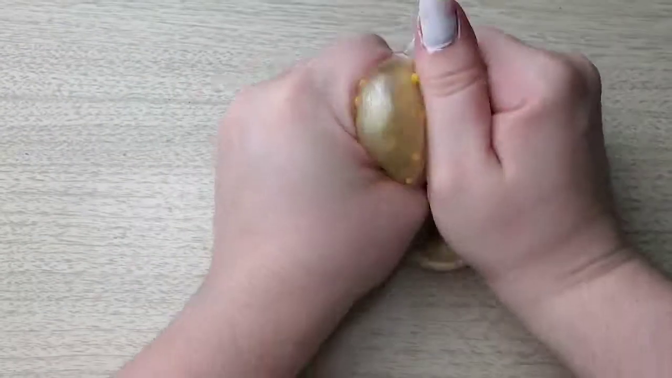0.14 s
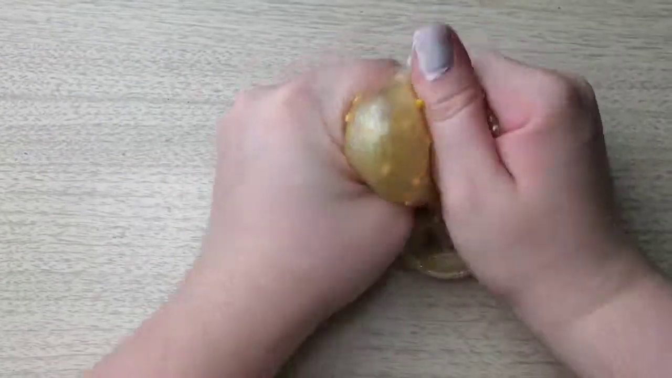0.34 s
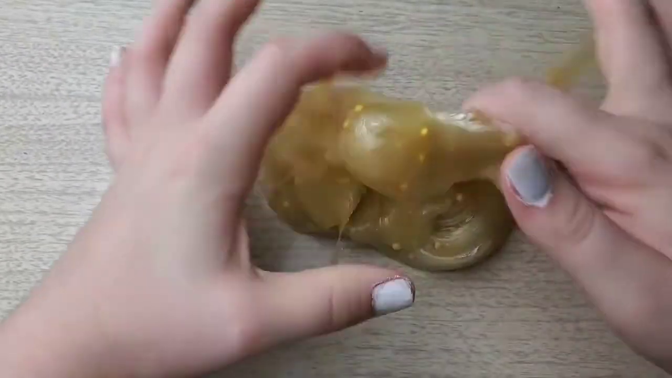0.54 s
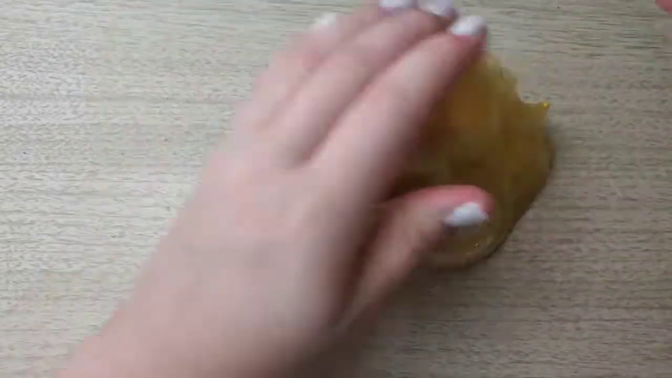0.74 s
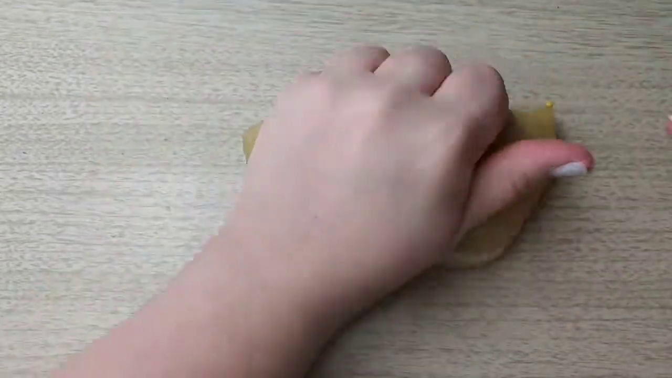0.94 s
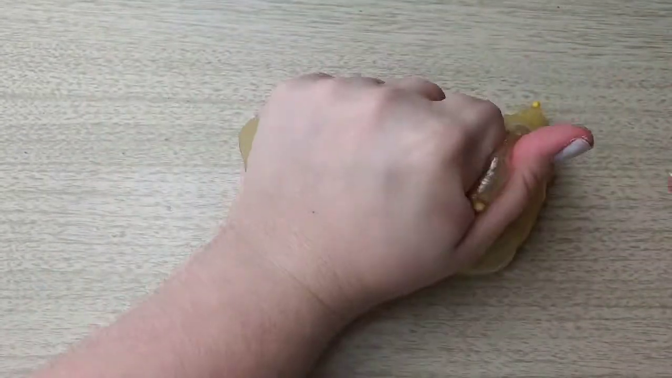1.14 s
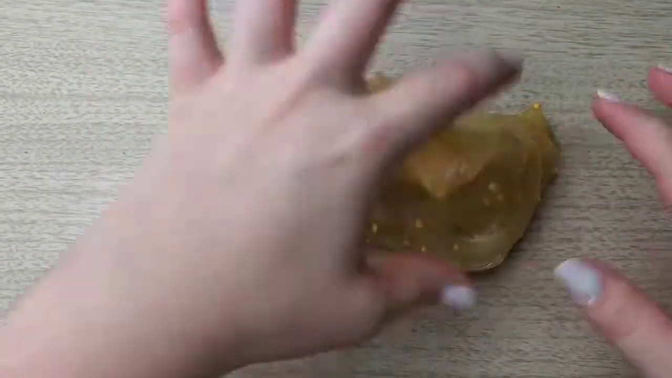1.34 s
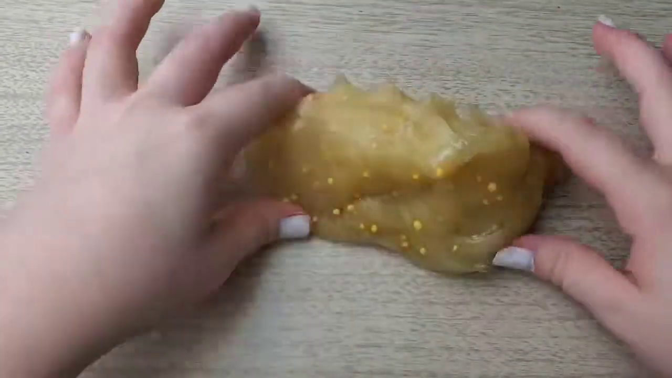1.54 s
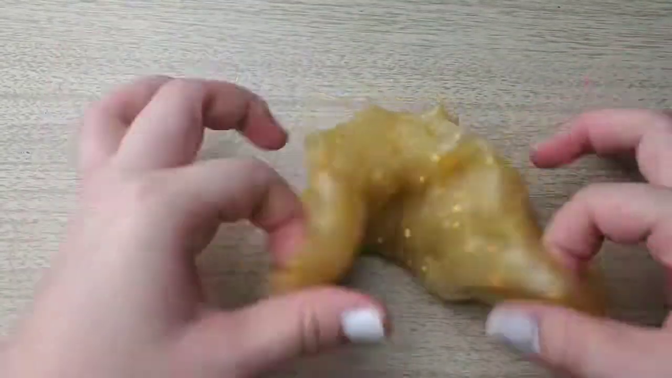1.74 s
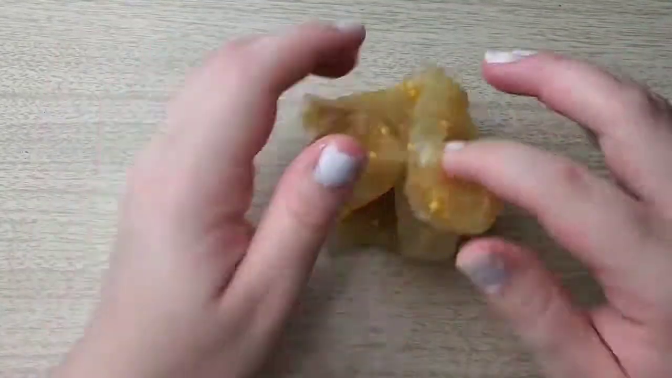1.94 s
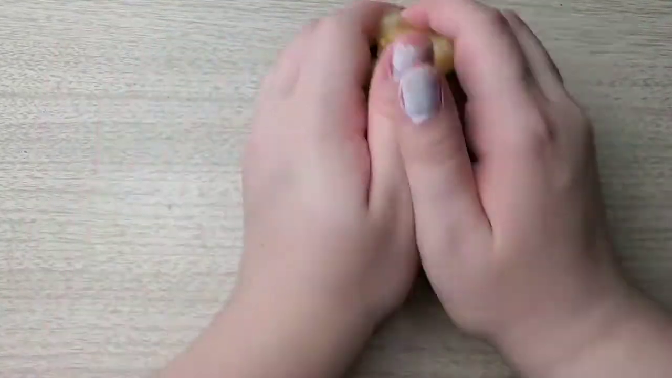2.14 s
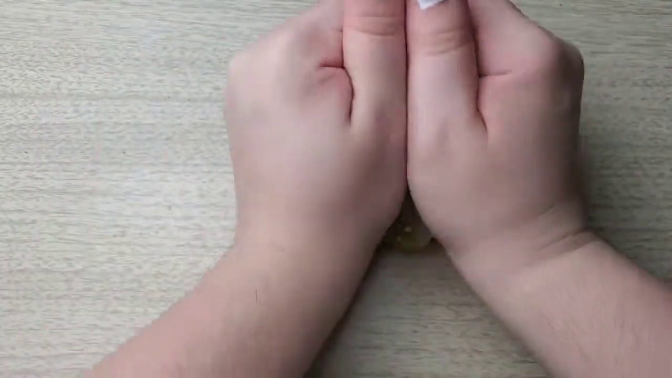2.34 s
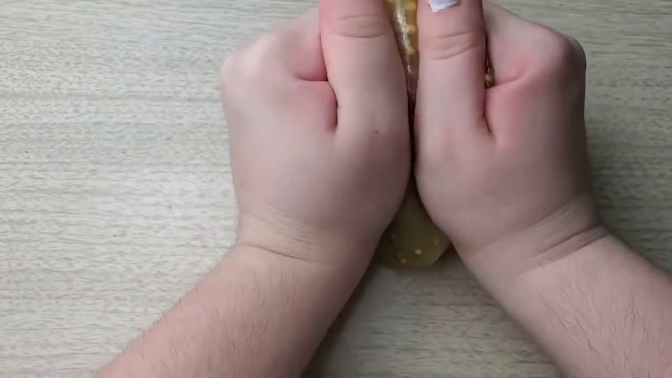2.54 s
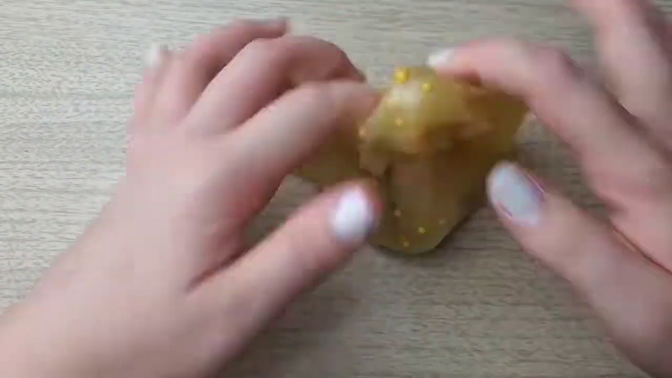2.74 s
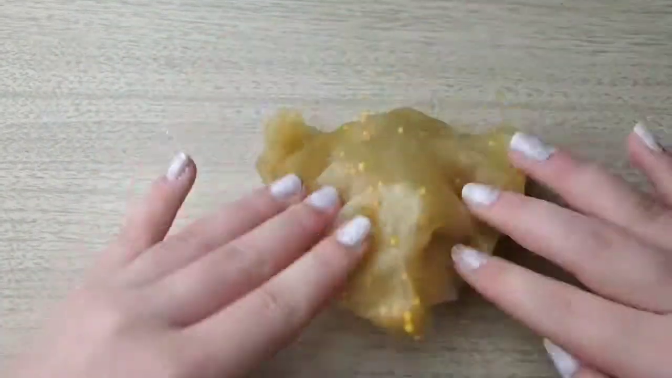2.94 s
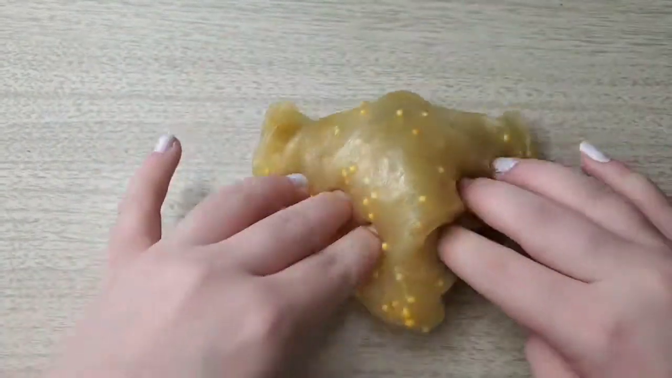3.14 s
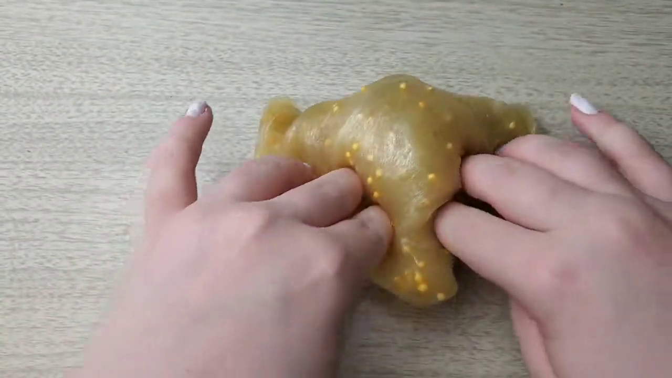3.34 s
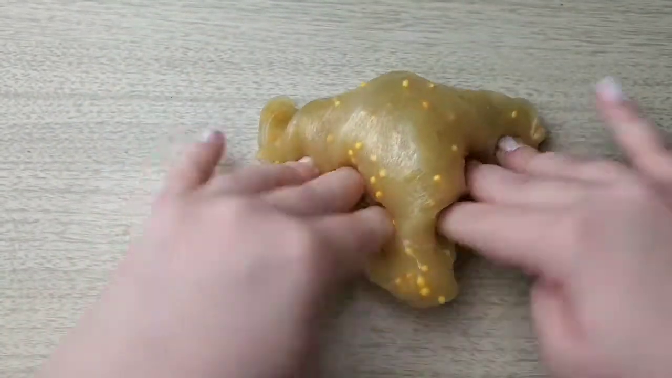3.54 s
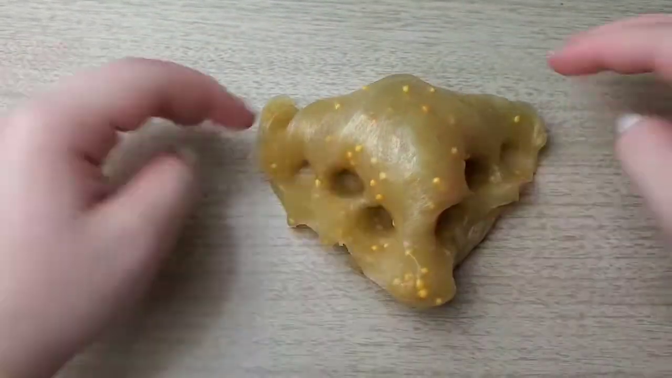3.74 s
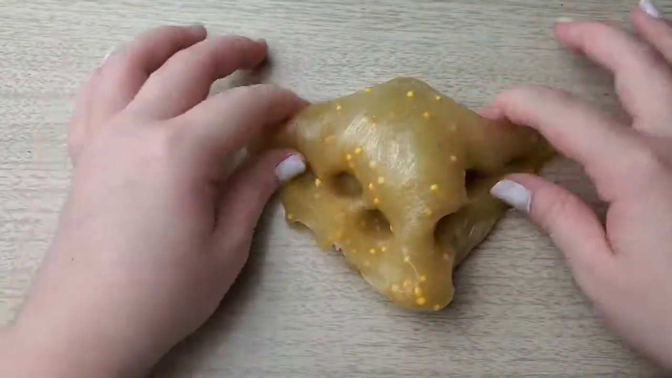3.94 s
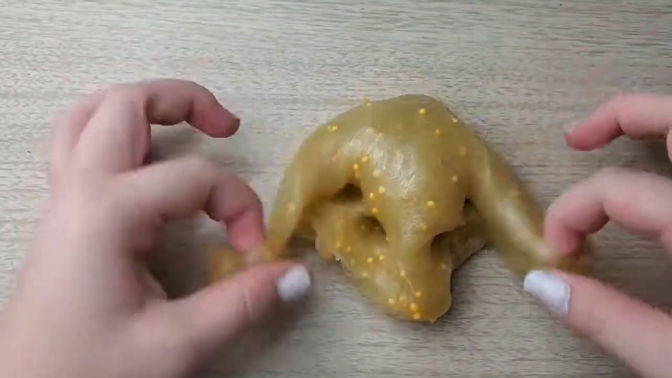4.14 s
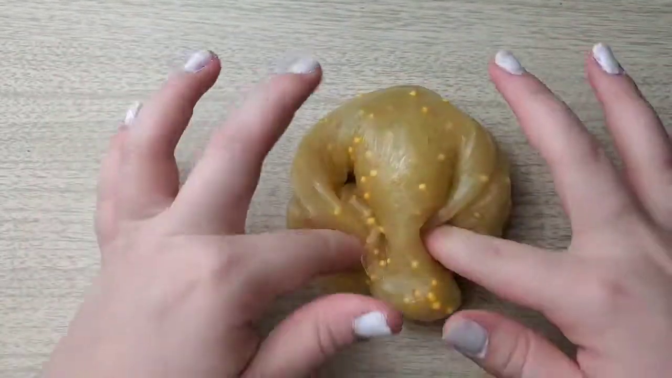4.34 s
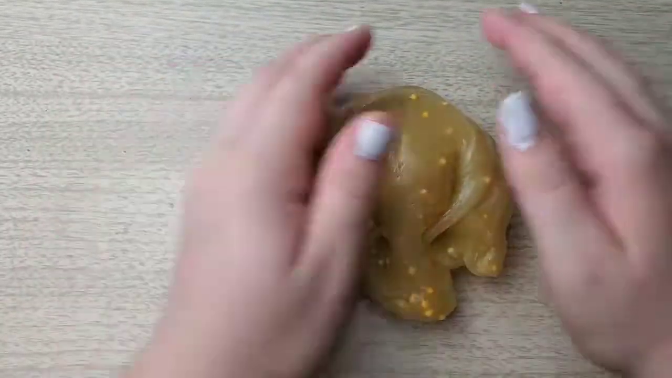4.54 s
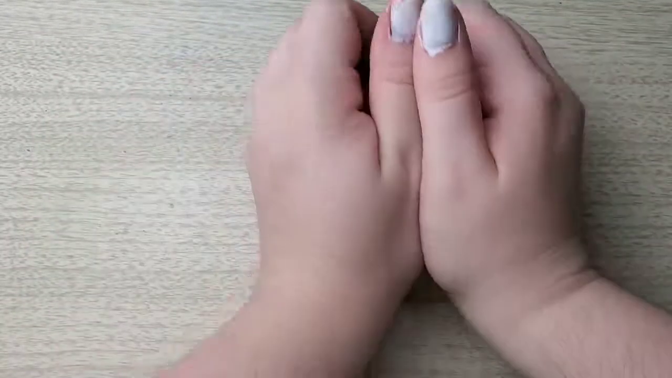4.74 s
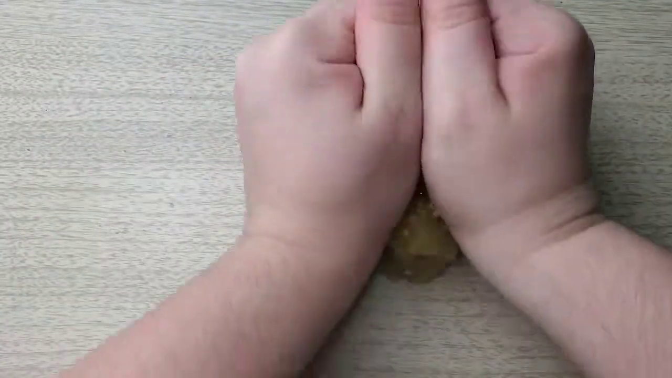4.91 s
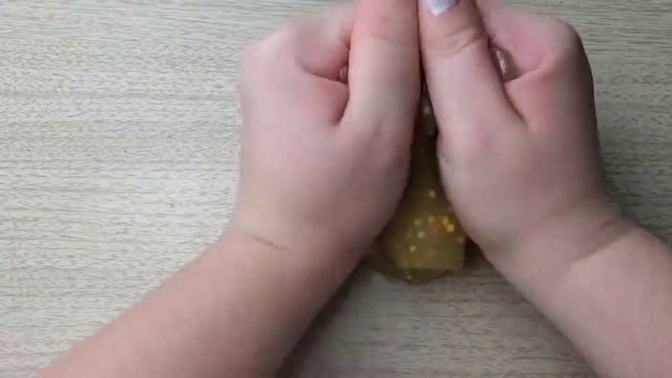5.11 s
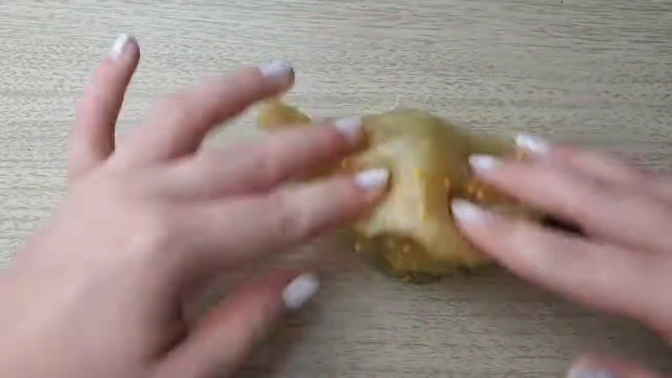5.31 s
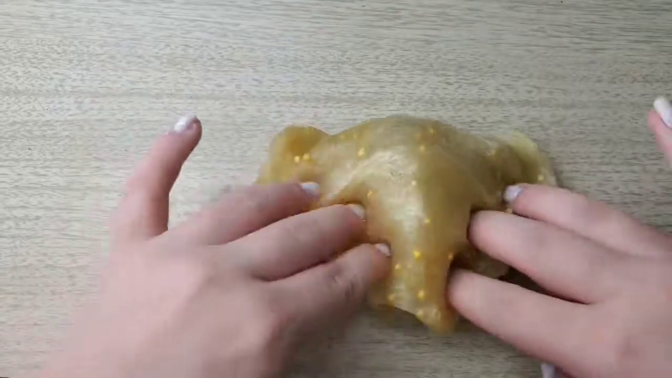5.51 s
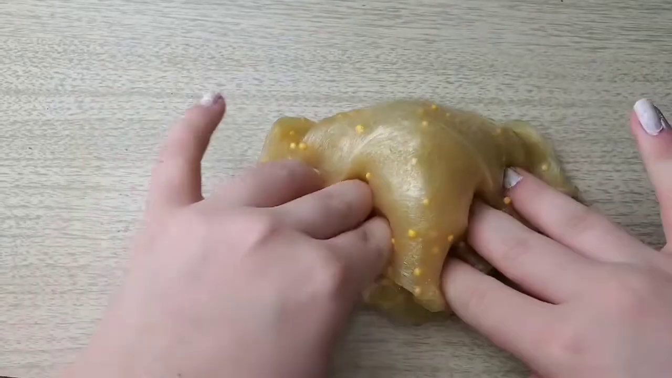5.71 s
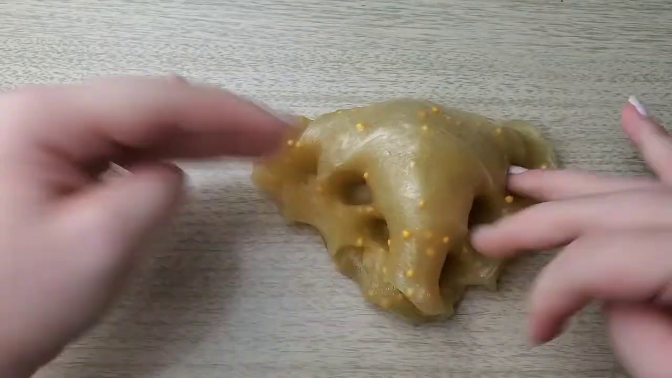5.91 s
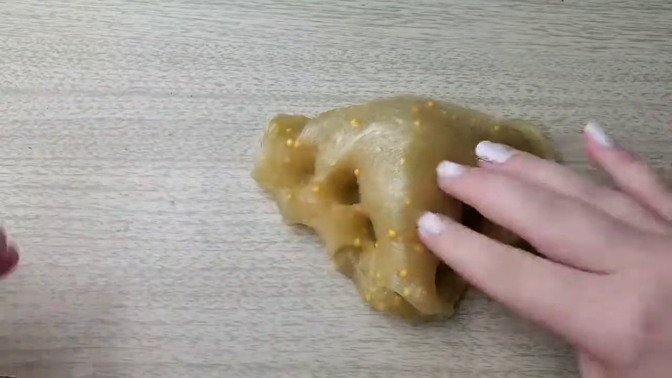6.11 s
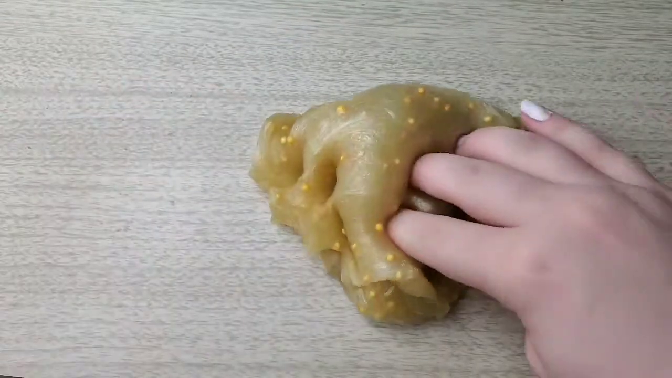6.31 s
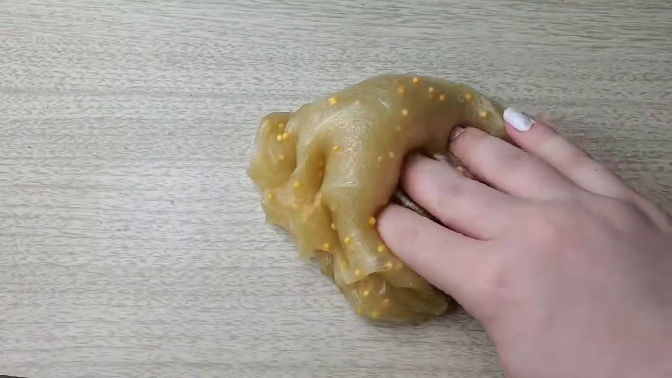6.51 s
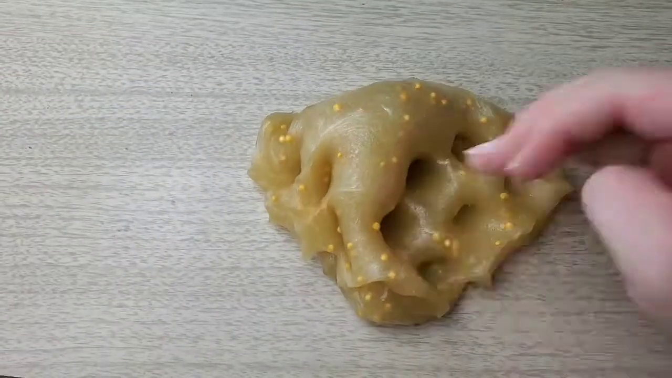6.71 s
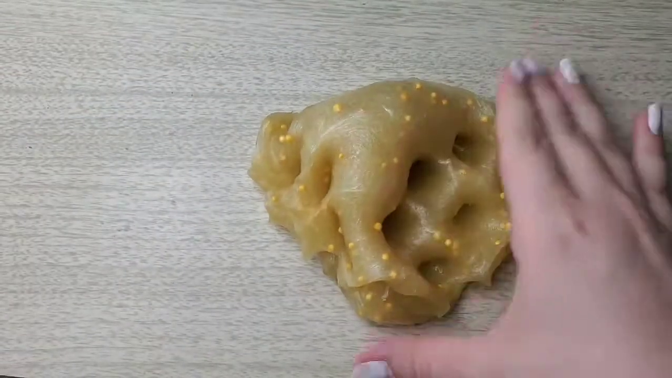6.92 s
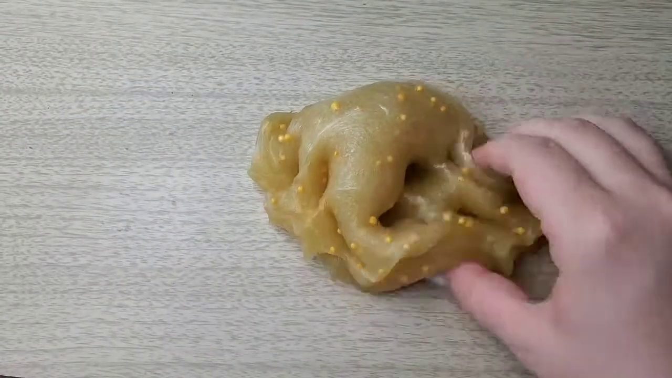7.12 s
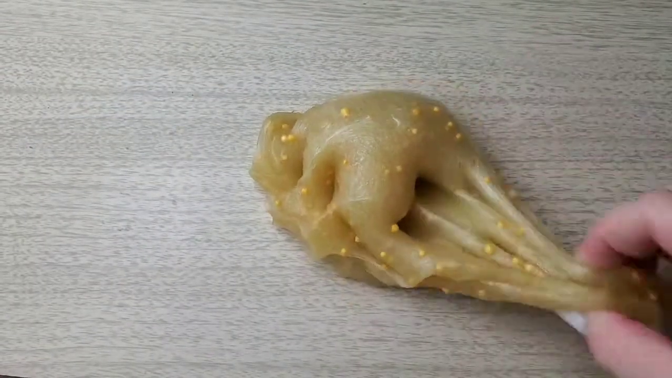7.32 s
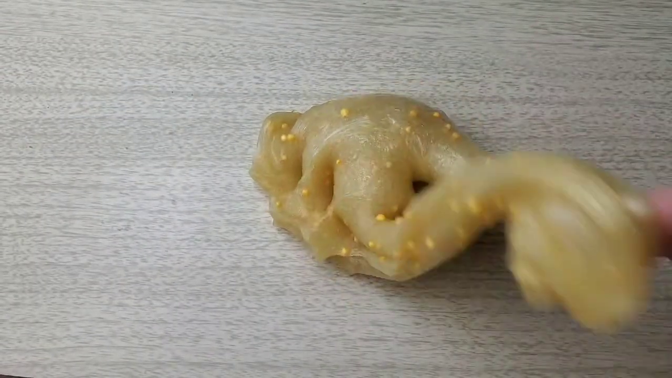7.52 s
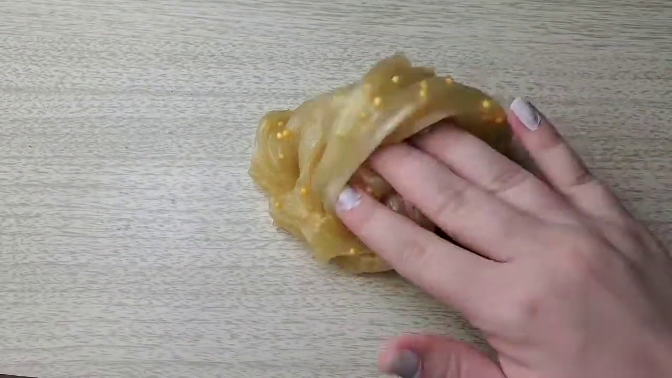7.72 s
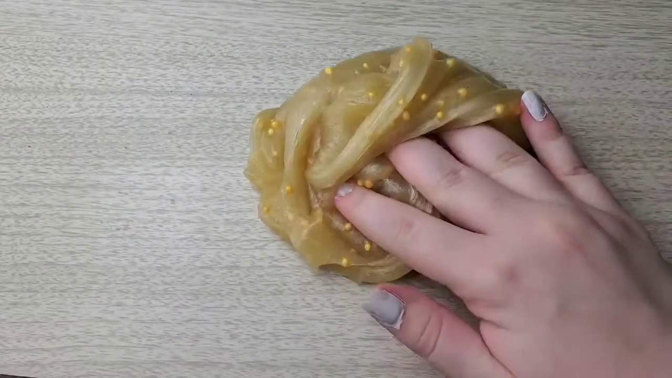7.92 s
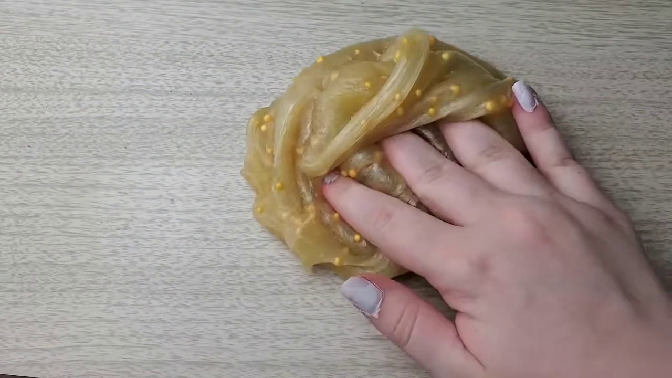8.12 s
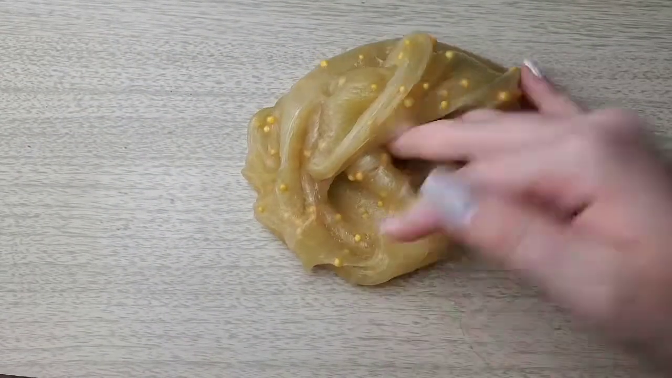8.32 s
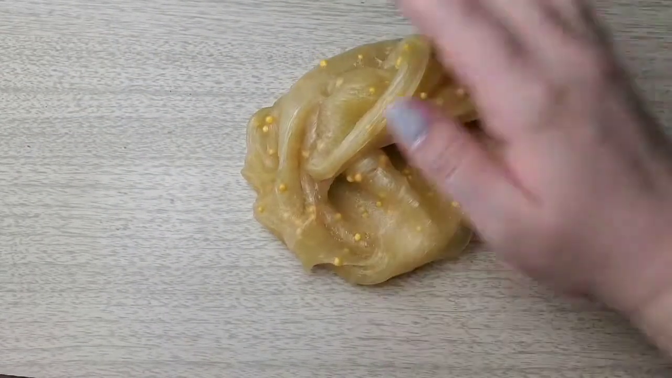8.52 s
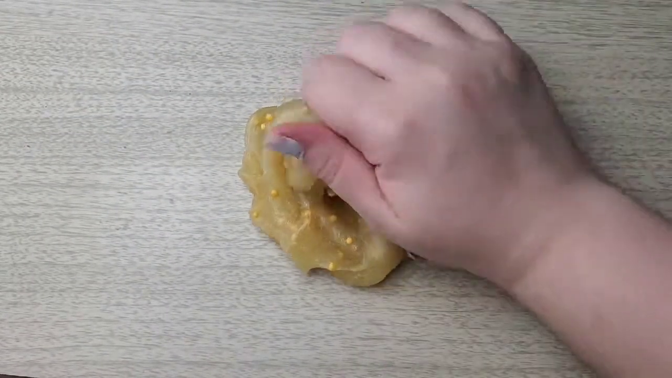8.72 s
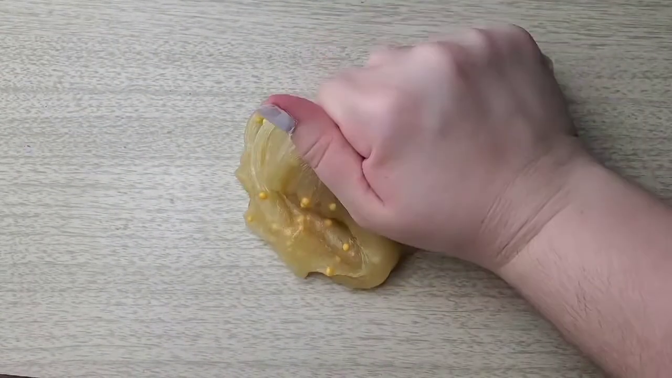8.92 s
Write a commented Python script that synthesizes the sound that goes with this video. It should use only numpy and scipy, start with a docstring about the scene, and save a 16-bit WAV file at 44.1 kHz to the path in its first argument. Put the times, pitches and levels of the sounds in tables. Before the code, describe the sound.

Close, crisp popping air pockets and sticky peeling crackle from slime worked by two hands, with soft bumps and plops over faint indoor hum.

```python
"""Throughout, a machine hums somewhere in the house over drifting room air: narrow and broad bands of noise.
Two hands knead sticky slime on a table in a small quiet room, starting with a dense run of sharp snaps:
bursting air pockets, each a torn-film noise that rings. Peeling skin crackles around them as filtered random ticks.
An early bump of the palms is a low decaying sine; then finger holes begin to close with hollow decaying plops.
Clusters of snaps, plops and crackle return between quieter spells, with a few more bumps in the second half."""
import sys
import numpy as np
from scipy import signal
from scipy.io import wavfile
from scipy.ndimage import uniform_filter1d

SR = 44100
rng = np.random.default_rng(int(sys.argv[2]) if len(sys.argv) > 2 else 0)


def wav_out(sig):
    """Save sig, one row per channel (or a flat mono array), as 16-bit PCM at SR to the path in sys.argv[1]."""
    wavfile.write(sys.argv[1], SR, np.round(np.clip(np.atleast_2d(sig).T, -1, 1) * 32767).astype(np.int16))


N = 395136


def amp(db):
    """Decibel law: a level in dB becomes an amplitude ratio."""
    return 10 ** (np.asarray(db) / 20)


def band(x, hz, width):
    """Second-order resonance with gain 1 at the centre; the width in Hz sets its damping."""
    centre = min(hz, .45 * SR)
    return signal.lfilter(*signal.iirpeak(centre, hz / width, fs=SR), x)


def fade(t60, count):
    """Exponential decay: the level falls 60 dB in t60 seconds."""
    return np.exp(-np.log(1000) * np.arange(count) / (t60 * SR))


def unit(x):
    """Power normalisation: the root mean square becomes 1."""
    return x / np.sqrt(np.mean(x ** 2))


def peak(x, db):
    """Peak normalisation: the largest excursion takes the given level."""
    return x * amp(db) / np.abs(x).max()


def add(out, start_s, x):
    """Superposition: a sound is summed into the output from its start time."""
    i = max(int(start_s * SR), 0)
    out[..., i:i + x.shape[-1]] += x[..., :N - i]


def walk(rate):
    """Slow random modulation: levels held 1 / rate s and smoothed twice; spread near 1."""
    hold = int(SR / rate)
    steps = np.repeat(rng.standard_normal(N // hold + 1), hold)
    return 1.3 * uniform_filter1d(uniform_filter1d(steps, hold), hold)[:N]


def pair(shape, likeness):
    """Interchannel coherence: left and right noise share a mid part and oppose in a side part."""
    c = np.clip(likeness, 0, 1)
    mid, side = rng.standard_normal((2, shape))
    return np.sqrt(1 + c) * mid + np.sqrt(1 - c) * side * np.array([[1], [-1]])


def ticks(rate):
    """Shot process: random tiny decaying bursts, rate per second, a few much louder than the rest."""
    sizes_db = 3.04 * np.minimum(rng.exponential(size=N), 4.5)
    impulses = amp(sizes_db) * (rng.random(N) < rate / SR)
    return signal.lfilter([1], [1, -np.exp(-1 / (0.0014 * SR))], impulses)


# spectrum of the room air: centre_hz [Hz], density_db [dB per Hz, relative]
AIR_SPECTRUM = [(15, -34), (25, -6.5), (64, -25), (102, -1), (149, -10), (190, -6), (242, -3), (309, -9),
                (840, -24), (1040, -43.5), (2610, -55.5), (6560, -45.5), (16000, -43.5)]
AIR_DB = -61.5  # rms of the whole air noise
# bands of the machine hum: centre_hz [Hz], width_hz [Hz], level_db [dB rms]
HUM_BANDS = [(58.25, 16, -58), (119, 20, -65), (154.1, 4, -62.5), (242.9, 10, -61)]


def house():
    """Narrow-band noise fluctuates as an unsteady hum; broadband air is most coherent in the bass."""
    air, swell = 0, walk(0.55)
    air_hz, density_db = np.array(AIR_SPECTRUM).T
    for hz in 30 * 2 ** np.arange(0, 9.2, .5):  # half-octave steps
        noise = band(band(pair(N, min(.92, 600 / hz)), hz, hz / 2.5), hz, hz / 4.7)
        # all bands drift together, and each a little on its own
        db = np.interp(np.log(hz), np.log(air_hz), density_db) + 2.1 * swell + 0.49 * walk(6)
        air = air + amp(db) * noise
    hum = 0
    for hz, width, db in HUM_BANDS:
        hum = hum + amp(db) * unit(band(band(pair(N, 0.91), hz, width), hz, 3 * width))
    return unit(air) * amp(AIR_DB) + hum


# reverberation bands: centre_hz [Hz], t60_s [s], level_db [dB of tail energy before its soft onset]
REVERB_BANDS = [(312, 0.19, -14.5), (1000, 0.19, -22.5), (2500, 0.25, -13), (5270, 0.32, -16),
                (9200, 0.12, -12), (13900, 0.13, -15.5)]
TABLE_ECHO_S, TABLE_ECHO_DB = .0037, -12


def room(x):
    """Convolution: the table top gives one early reflection, the walls a dense tail that decays by band."""
    count = SR // 2
    tail = 0
    for hz, t60, db in REVERB_BANDS:
        part = band(band(pair(count, 400 / hz), hz, hz), hz, hz) * fade(t60, count=count)
        tail = tail + part * amp(db) / np.sqrt(np.sum(part ** 2) / 2)
    tail *= 1 - np.exp(-np.arange(count) / (.002 * SR))  # the tail builds up over a few milliseconds
    tail[:, int(TABLE_ECHO_S * SR)] += amp(TABLE_ECHO_DB)
    return x + signal.fftconvolve(x, tail, axes=1)[:, :N]


# palms bumping the table: start_s [s], level_db [dB peak], pitch_hz [Hz]
PALM_BUMPS = [(0.142, -33.5, 77.5), (4.979, -36.5, 73.6), (6.732, -36.5, 54), (8.351, -33.5, 61.9),
              (8.737, -37, 61.4)]


def bumps():
    """Damped oscillation: the table answers each palm with a softly started, dying low sine."""
    out, t = np.zeros(N), np.arange(8192) / SR
    for start_s, db, hz in PALM_BUMPS:
        onset = 1 - np.exp(-t / .002)
        add(out, start_s, peak(np.sin(2 * np.pi * hz * t) * fade(0.032, count=8192) * onset, db))
    return out


# finger holes closing: start_s [s], level_db [dB peak, cavity alone], pitch_hz [Hz]
HOLE_PLOPS = [(0.423, -27, 950), (0.93, -31, 890), (1.012, -25, 846), (3.564, -33.5, 339),
              (3.57, -32.5, 262), (3.589, -27, 672), (4.394, -45.5, 389), (5.875, -34.5, 406),
              (5.897, -29.5, 1010), (5.92, -25.5, 646), (5.936, -37.5, 337), (6.654, -25, 930),
              (6.681, -20.5, 646), (6.702, -22, 660), (6.716, -27.5, 633), (6.968, -52, 604),
              (7.127, -35, 638), (8.326, -30, 251), (8.33, -32, 634), (8.349, -32, 640), (8.594, -62, 1350)]
# resonances of the table top under the plops: centre_hz [Hz], width_hz [Hz], level_db [dB gain]
TABLE_MODES = [(328, 70, -5), (638, 50, -3)]


def plops():
    """Cavity resonance: a closing hole rings, shaken by ragged suction noise, and excites the table top."""
    cavities, t = np.zeros(N), np.arange(8192) / SR
    for start_s, db, hz in HOLE_PLOPS:
        ring = np.sin(2 * np.pi * hz * t) * fade(0.028, count=8192)
        ragged = unit(band(rng.standard_normal(8192), hz, hz)) * fade(0.15, count=8192)
        add(cavities, start_s + 0.00089, peak(ring + 0.27 * ragged, db))
    table = sum(amp(db) * band(cavities, hz, width) for hz, width, db in TABLE_MODES)
    return cavities + table


# skin peeling off or sliding over the slime: start_s [s], hold_s [s], level_db [dB, crackle drive],
# dryness_db [dB of rise towards the treble per 3.6 octaves]
PEEL_STROKES = [(0, 0.0073, -35.5, -5), (0.075, 0.057, -33, 8), (0.224, 0.0067, -40, 11),
                (0.377, 0.054, -42, -0.5), (0.434, 0.15, -59, 1), (0.977, 0.15, -34.5, 7.5),
                (1.241, 0.054, -46.5, -3.5), (1.617, .15, -57, 3.5), (2.202, .07, -60.5, -4),
                (2.303, 0.2, -44, 11), (2.63, 0.069, -41, -1), (3.154, 0.075, -58, 5),
                (3.992, 0.094, -58.5, 7), (4.39, 0.015, -57.5, -5), (4.584, 0.17, -68, 13.5),
                (4.733, 0.14, -51.5, -0.5), (4.908, 0.059, -37, 11.5), (5.004, 0.093, -47.5, 18.5),
                (5.145, 0.041, -43, -5.5), (5.231, 0.038, -59, 3), (7.048, 0.2, -64, 14),
                (7.16, 0.019, -50.5, -1), (7.255, 0.078, -61, -9), (7.49, .02, -71, 20),
                (7.736, 0.022, -60, 7), (8.314, 0.018, -36, -1.5), (8.681, .03, -56, -9),
                (8.729, 0.0068, -39, 10), (8.78, 0.067, -47, 2), (8.883, 0.024, -34.5, 7.5),
                (8.927, .04, -58, 18)]
GRIP_DB_PER_S, RELEASE_DB_PER_S = 501, 305  # how fast a stroke swells and dies away
RESTING_DB, RESTING_DRY_DB = -85.5, 2  # the lump creeps and ticks faintly when left alone


def strokes():
    """Energy summation: swelling, held and dying strokes add in power, which also weights their dryness."""
    t = np.arange(0, N + 64, 64) / SR
    power = amp(RESTING_DB) ** 2 + 0 * t
    weighted_dry = RESTING_DRY_DB * power
    for start_s, hold_s, db, dry_db in PEEL_STROKES:
        swell_db = GRIP_DB_PER_S * np.maximum(start_s - t, 0)
        release_db = RELEASE_DB_PER_S * np.maximum(t - start_s - hold_s, 0)
        stroke_power = amp(db - swell_db - release_db) ** 2
        power = power + stroke_power
        weighted_dry = weighted_dry + dry_db * stroke_power
    times = np.arange(N) / SR
    level_db = np.interp(times, t, 10 * np.log10(power))
    return level_db, np.interp(times, t, weighted_dry / power)


# crackle by bubble size: pitch_hz [Hz], level_db [dB, relative to the stroke]
BUBBLE_SIZES = [(800, -9), (1400, -8.5), (2400, -11.5), (4000, -4.5), (6500, -7.5), (10000, -10.5),
                (14000, 0)]
PATCHY_DB = 3  # each bubble size flares on its own


def peel():
    """Granular excitation: snapping threads drive all bubble bands in flurries, and each band also ticks alone."""
    level_db, dry_db = strokes()
    threads, flurry_db, out = ticks(400) + 0.2, 2.9 * walk(90), 0
    for hz, db in BUBBLE_SIZES:
        drive = (threads + 0.35 * ticks(150)) * amp(flurry_db + PATCHY_DB * walk(50))
        grains = pair(N, 500 / hz) * drive
        bubbles = unit(band(band(grains, hz, 0.91 * hz), hz, 0.91 * hz))
        # dry skin hisses, wet slime smacks
        tilt_db = dry_db * np.log2(hz / 4000) / 3.6
        out = out + amp(db + tilt_db) * bubbles
    return amp(level_db) * out


# bursting air pockets: start_s [s], level_db [dB peak of the ring], pitch_hz [Hz],
# dryness_db [dB, airy top minus wet smack; the rise of the top stops at 12 dB]
POCKET_SNAPS = [(0.016, -12, 7050, 3), (0.0456, -27, 4950, 26), (0.0614, -11, 4740, 7),
                (0.0791, -11, 8650, -1), (0.097, -13.5, 5260, 24), (0.118, -10, 4100, 4),
                (0.1416, -13.5, 7600, 23), (.151, -26, 5960, 24), (0.171, -22.5, 5930, 15.5),
                (0.184, -21.5, 9400, 30), (0.2436, -26, 7150, 20), (.358, -34, 3450, 12),
                (0.3838, -24, 4670, -4), (0.4268, -23, 5080, 8), (0.5904, -38, 6500, 7.5),
                (.635, -45.5, 5860, 8.5), (0.894, -55, 6550, 25), (0.9196, -18, 6000, 1),
                (0.9327, -14.5, 3240, 10), (0.9848, -12.5, 7200, 5), (1.0121, -8.5, 3600, 26),
                (1.021, -5.5, 5000, 20), (1.0759, -10, 5560, 19), (1.1126, -10, 7800, -6),
                (1.1609, -3.5, 6970, 20.5), (1.5448, -56, 8770, 15.5), (1.6579, -31.5, 7600, 15),
                (2.197, -45, 3500, 5), (2.2864, -25, 7700, 5.5), (2.3142, -14, 4640, 5),
                (2.3592, -9, 5800, 0), (2.4143, 2, 5940, 15.5), (2.907, -54, 7600, 23.5),
                (3.1244, -15.5, 4800, 17), (3.1614, -25, 8400, 21.5), (3.1875, -34, 7200, 25),
                (3.244, -37, 8600, 17.5), (3.3537, -38.5, 7150, 23.5), (3.5625, -22, 4350, 21),
                (3.5733, -3.5, 5060, 16), (3.587, -5.5, 5580, 28), (3.591, -1.5, 6140, 31),
                (4.2598, -44, 9030, 25.5), (4.378, -33.5, 6960, 7), (4.396, -40.5, 4330, 2.5),
                (4.7095, -12.5, 7400, 24.5), (4.741, -14, 6650, 23), (4.8053, -28, 5200, 28),
                (4.8316, -31, 8000, 32), (4.8807, -24, 4620, -10), (4.9055, -11.5, 6600, 2),
                (4.9755, -21.5, 9160, 22), (4.9665, -23.5, 6060, 10.5), (4.9968, -25, 9000, 28),
                (5.0639, -12.5, 5900, 7), (5.0791, -8.5, 7040, 34), (5.1512, -24, 4830, -4),
                (5.516, -54.5, 5900, 18), (5.6697, -52, 7740, 18.5), (5.8309, -47.5, 6760, 21.5),
                (5.8768, -21, 4680, 18), (5.8981, -7, 6960, 11), (5.9009, -10, 4950, -6),
                (5.921, -3.5, 6220, 18.5), (6.234, -63, 7500, 27.5), (6.338, -47.5, 6560, 30),
                (6.6564, -10.5, 8920, 18), (6.6817, -1, 6930, 27), (6.703, -7, 4430, 4),
                (7.0525, -46, 9200, 28.5), (7.1277, -16, 8600, -1.5), (7.6996, -32.5, 7900, 30),
                (7.7356, -27, 4600, 18), (7.75, -38, 4460, 1), (7.776, -35, 5490, 15.5),
                (8.123, -31.5, 8700, 25.5), (8.6713, -38.5, 8570, 23), (8.7808, -14.5, 6200, 15),
                (8.801, -19, 6350, 39), (8.8284, -19.5, 8900, 43), (8.841, -31, 7000, 23),
                (8.857, -19, 8200, 30), (8.8736, -7.5, 3440, 7), (8.951, -35, 8000, 27)]
LIPS_DB, LIPS_PER_DB = -11, 0.86  # smack and airy top when even; they grow more slowly than the ring
SIZZLE, SIZZLE_PER_DB = 0.076, 0.38  # mean sizzling share in resting slime; its growth under a louder stroke
CHANNEL_SHIFT_S = .00007  # most that each channel is moved, in opposite directions


def snaps():
    """Impulsive excitation: a film tear rings the pocket, smacks the wet lips, spits air and may sizzle on."""
    out = np.zeros((2, N))
    rise = 1 - np.exp(-np.arange(1024) / (0.00012 * SR))
    crackle_db, _ = strokes()
    for start_s, db, hz, dry_db in POCKET_SNAPS:
        stroke_db = crackle_db[int(start_s * SR)] - RESTING_DB
        sizzle = min(SIZZLE * amp(SIZZLE_PER_DB * stroke_db), 1) * rng.uniform(.6, 1.4)
        decay = fade(0.0029, count=1024) + sizzle * fade(0.039, count=1024)
        tear = pair(1024, 0.55) * rise * decay
        lips_db = LIPS_DB + LIPS_PER_DB * db
        pocket = band(band(tear, hz, 0.73 * hz), hz, hz)
        ring = peak(pocket + 0.057 * band(tear, 7100, 4300), db)
        both_alike = tear + tear[::-1]  # channels swapped and summed: the smack is the same on both sides
        smack = peak(band(band(both_alike, 1500, 2000), 1900, 1800), lips_db - dry_db / 2)
        spit = peak(band(band(tear, 12500, 7800), 12500, 15000), lips_db + min(dry_db / 2, 12.))
        left, right = ring + smack + spit
        shift = CHANNEL_SHIFT_S * rng.uniform(-1, 1)
        add(out[0], start_s - .0003 + shift, left)
        add(out[1], start_s - .0003 - shift, right)
    return out


LEFT_DB = 1.04  # left over right: the hands work a little left of the microphones


def scene():
    """Superposition: the slime and table sounds excite the room; the house noise is added to them."""
    slime = (snaps() + peel() + plops() + bumps()) * amp([[LEFT_DB / 2], [-LEFT_DB / 2]])
    return room(slime) + house()


TOP_HZ = 16800  # edge of the steep cut


def record(dry):
    """Low-pass filtering: a 16 dB step down above 15.9 kHz, then a steep cut at TOP_HZ."""
    shelf = signal.ellip(6, .5, 16, 15900, fs=SR, output="sos")
    steep_cut = signal.ellip(12, .2, 90, TOP_HZ, fs=SR, output="sos")
    return signal.sosfilt(steep_cut, signal.sosfilt(shelf, dry))


dry = scene()
out = record(dry)
wav_out(out)
```